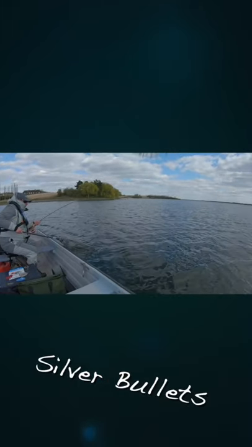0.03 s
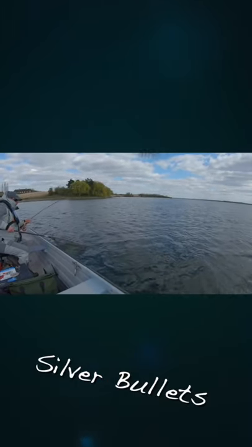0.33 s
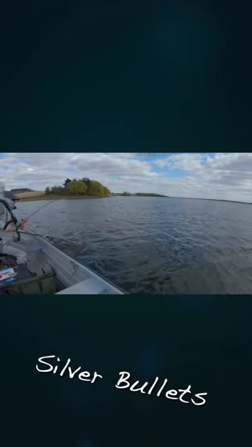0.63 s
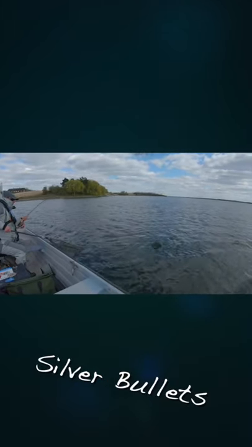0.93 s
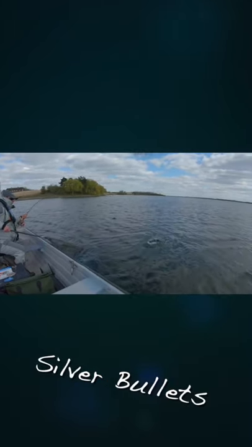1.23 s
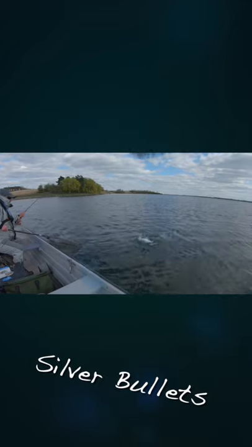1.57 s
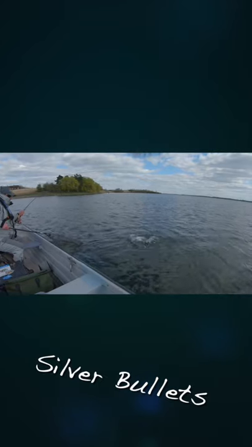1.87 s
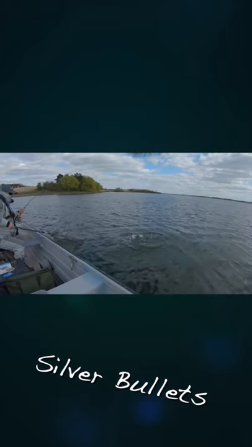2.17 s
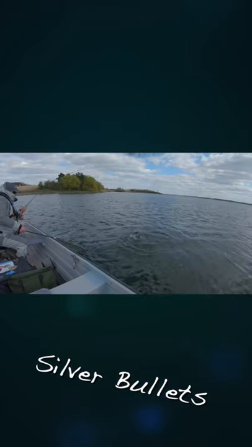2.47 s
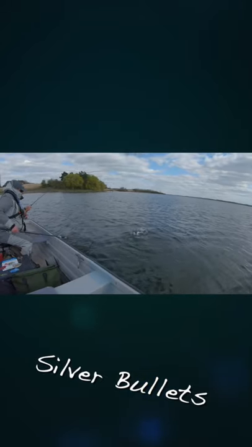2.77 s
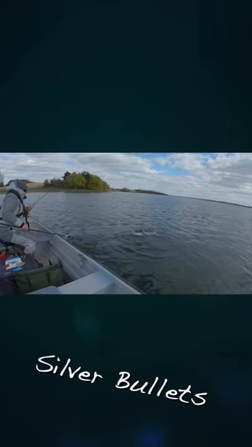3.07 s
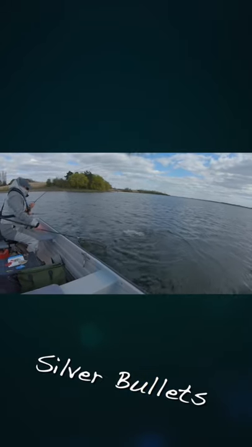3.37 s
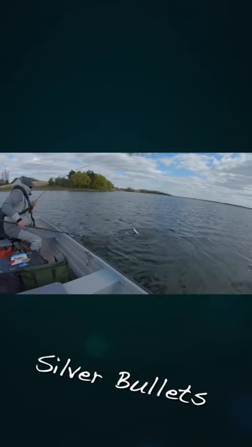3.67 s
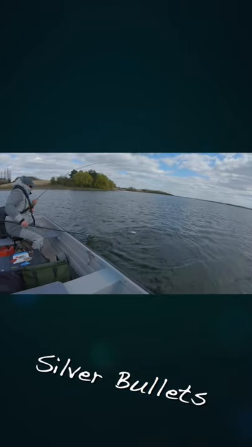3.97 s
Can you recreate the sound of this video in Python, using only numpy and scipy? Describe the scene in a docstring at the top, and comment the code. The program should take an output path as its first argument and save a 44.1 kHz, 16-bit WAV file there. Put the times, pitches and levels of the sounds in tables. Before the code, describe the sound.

A hooked fish thrashes at a lake's surface a few metres from a small boat. After some faint knocks, it splashes repeatedly with tail slaps, plops and gurgles, while wind rumbles on the microphone throughout.

```python
"""A hooked fish thrashes at the surface of a lake, a few metres from a small open boat.
Its tail slaps the water in broadband impacts and its plunging body traps gulps of air. Each bubble
rings as a damped oscillator: single ones plop, many gurgle, and spray patters back.
Turbulent wind buffets the microphone throughout, over a quiet hiss and a very faint electrical whine.
There are a few faint knocks in the boat and two sharp ticks."""
import sys
import numpy as np
from scipy import signal
from scipy.fft import rfft, irfft
from scipy.io import wavfile

SR = 44100
rng = np.random.default_rng(int(sys.argv[2]) if len(sys.argv) > 2 else 0)


def to_wav(sig):
    """Store sig (one row per channel, or 1-D mono) as 16-bit WAV at the path in sys.argv[1].

    Samples outside -1..1 are clipped; the rate is SR.
    """
    pcm = np.clip(np.atleast_2d(sig), -1, 1) * 32767
    pcm = np.round(pcm).astype(np.int16)
    wavfile.write(sys.argv[1], SR, pcm.T)  # frames by channels


N = 176400
TIME = np.arange(N) / SR

# Spectra of the still air and the three parts of the wind: f/Hz, relative spectral density/dB
AIR_SPECTRUM = [(1500, 1), (2500, -8), (4000, -8.5), (8000, -12.5), (15500, -16)]
BUFFET_SPECTRUM = [(4, 0), (20, -8), (50, -18), (70, -25), (200, -70)]
DRUM_SPECTRUM = [(35, -22), (60, -3), (78, 0), (90, -3), (105, -11), (250, -55)]
RUSH_SPECTRUM = [(80, -8), (135, 2), (200, -3), (350, -11), (600, -24), (900, -36), (3000, -68)]
# Strength of the wind's buffeting, drumming near 80 Hz and upper rush: t/s, relative level/dB
BUFFET_LEVELS = [(0.3, -38), (2.35, -35), (3.2, -38.5), (3.3, -34.5), (3.8, -38.5)]
DRUM_LEVELS = [(0.1, -39), (0.68, -33.5), (0.78, -26.5), (0.97, -37.5), (1.65, -18.5), (1.69, -36),
               (2.62, -32.5), (2.78, -22), (3.9, -23.5)]
RUSH_LEVELS = [(0.15, -42), (0.4, -49), (0.6, -50), (0.86, -43), (0.99, -45), (1.05, -55), (1.11, -44),
               (1.28, -42), (1.51, -47), (1.62, -40), (1.78, -53), (1.83, -47), (3.7, -42), (3.8, -46)]

# Knocks in the boat: t/s, bump level/dB, scuff level/dB
KNOCKS = [(0.139, -56, -67), (.277, -54, -58.5), (.48, -56, -70.5), (0.602, -58.5, -84), (.665, -66, -65)]
# Sharp ticks, probably from the tackle: t/s, level/dB
TICKS = [(2.599, -38), (2.617, -48.5)]
# Spectra of these contacts: f/Hz, relative spectral density/dB
BUMP_SPECTRUM = [(300, -10.5), (620, 2), (1250, -12), (2800, -25)]
SCUFF_SPECTRUM = [(1300, -2), (5000, -2.5), (8000, -16), (15000, -32.5)]
TICK_SPECTRUM = [(2300, 2), (5000, -7), (8000, -2), (11000, -12.5), (13500, -1), (15500, -14)]

# Amount of spray falling back: t/s, relative level/dB
SPRAY_LEVELS = [(1.0, -73.5), (1.11, -61), (1.3, -57.5), (1.42, -50.5), (1.56, -57), (1.66, -48.5),
                (1.78, -59), (1.95, -51), (2.14, -51.5), (2.26, -53), (2.38, -54.5), (2.47, -54),
                (2.67, -56.5), (2.9, -49.5), (3.02, -55), (3.32, -48), (3.53, -56.5), (3.62, -57.5),
                (3.78, -63), (4.0, -62)]
# Single bubbles: t/s, peak level of the tone/dB, starting f/Hz, 60 dB ring time/s
PLOPS = [(1.034, -45, 2310, 0.0049), (1.107, -38.5, 1790, .011), (1.168, -50, 817, .07),
         (1.202, -47, 2500, 0.023), (1.396, -34, 883, .018), (1.56, -50.5, 6650, 0.011),
         (1.615, -44, 7800, 0.0075), (1.724, -46, 980, .027), (1.965, -39, 1180, 0.0085),
         (1.997, -48, 1570, 0.043), (2.21, -36.5, 2020, 0.0095), (2.502, -40.5, 1970, .022),
         (2.552, -44, 1220, .025), (2.563, -41.5, 750, 0.026), (2.622, -40, 1650, 0.0089),
         (2.648, -42, 1630, 0.021), (2.8, -43.5, 960, 0.017), (2.922, -35.5, 493, 0.015),
         (2.944, -39.5, 840, 0.042), (3.021, -37, 887, 0.02), (3.102, -36.5, 1250, 0.021),
         (3.574, -30.5, 1950, 0.0051), (3.612, -49, 1820, 0.0069), (3.683, -47.5, 2140, 0.022),
         (3.757, -51.5, 1340, 0.015), (3.82, -53, 1260, 0.023), (3.896, -54, 1370, .014)]
# Plunges of the body: t/s, relative level/dB, hold time/s, centre f/Hz
PLUNGES = [(1.333, -49.5, 0.0088, 676), (1.381, -44.5, .012, 850), (1.469, -43, 0.011, 1050),
           (1.603, -42.5, .012, 1000), (1.616, -48.5, .05, 700), (2.162, -47, .012, 960),
           (2.173, -38, 0.011, 840), (2.453, -46.5, 0.022, 1140), (2.499, -42.5, 0.0092, 860),
           (2.518, -45.5, 0.026, 900), (2.87, -38.5, .012, 715), (2.971, -49.5, 0.089, 796),
           (3.076, -47.5, 0.015, 1030), (3.142, -49.5, 0.049, 1070), (3.389, -42.5, 0.031, 870),
           (3.426, -51, 0.1, 950)]
# Slaps of the tail: t/s, level/dB, decay time constant/s
SLAPS = [(1.337, -48.5, .003), (1.386, -44.5, 0.0049), (1.489, -40, 0.0072), (1.83, -50, 0.0089),
         (2.244, -49.5, 0.011), (2.326, -48, 0.0086), (2.718, -38, 0.0065), (2.865, -45.5, 0.017),
         (3.085, -44, 0.012), (3.312, -47.5, 0.0035), (3.356, -51, 0.0038), (3.75, -54, 0.0043)]
# Spectra of spray, displaced water, slaps and their snaps: f/Hz, relative spectral density/dB
SPRAY_SPECTRUM = [(400, 0.5), (800, 3.5), (1300, 0), (2300, -2.5), (3400, -6.5), (4500, -9.5),
                  (5600, -17.5), (8000, -11), (10000, -22), (13000, -18.5), (15500, -26)]
THUD_SPECTRUM = [(250, 0), (450, -2), (650, -8)]
SLAP_SPECTRUM = [(400, -4.5), (2500, -1), (4000, -5), (5800, -13), (8000, -9.5), (10500, -18), (13000, -20),
                 (15500, -35)]
SNAP_SPECTRUM = [(2500, -3), (8000, 0), (15000, -3)]

BUBBLE_ATTACK_S = .00076


def from_db(db):
    """Amplitude ratio: a factor of ten for every 20 dB."""
    return 10 ** (np.asarray(db) / 20)


def rms_one(x):
    """Normalisation to unit rms amplitude."""
    return x / np.sqrt(np.mean(x ** 2) + 1e-20)


def drift(corner_hz):
    """Low-pass filtered noise: a random fluctuation of unit rms."""
    hz = np.arange(N // 2 + 1) * SR / N
    return rms_one(irfft(rfft(rng.standard_normal(N)) / (1 + (hz / corner_hz) ** 2), N))


def level_curve(rows):
    """Gain at every sample, by linear interpolation of level in time."""
    return from_db(np.interp(TIME, *np.transpose(rows)))


def gain_at(spectrum, hz):
    """Gain at a frequency, by interpolation of level on a logarithmic frequency axis."""
    f, db = np.transpose(spectrum)
    return from_db(np.interp(np.log(hz), np.log(f), db))


def noise(spectrum):
    """Spectral shaping of white noise, rolling off beyond the ends of the spectrum; unit rms."""
    hz = np.arange(1, N // 2 + 2) * SR / N
    roll_off = (1 + (spectrum[0][0] / (2 * hz)) ** 4) * (1 + (hz / (2 * spectrum[-1][0])) ** 4)
    return rms_one(irfft(rfft(rng.standard_normal(N)) * gain_at(spectrum, hz) / roll_off, N))


def burst(start, attack_s, decay_s, hold_s=0):
    """Envelope of a transient: linear rise, hold and exponential decay."""
    age = TIME - start
    return np.clip(age / attack_s, 0, 1) * np.exp(-np.clip((age - attack_s - hold_s) / decay_s, 0, 50))


def background():
    """Stationary hiss and an electrical whine of three harmonics under random amplitude modulation."""
    whine_hz = 3910
    whine = sum(from_db(-7.5 * k) * np.sin(2 * np.pi * (k + 1) * whine_hz * TIME) for k in range(3))
    hiss = from_db(-72) * noise(AIR_SPECTRUM)
    waver_db = 6 * np.tanh(drift(corner_hz=18))
    return hiss + from_db(-80.5 + waver_db) * whine


def wind():
    """Turbulent pressure: slow eddies thump on the microphone and set it drumming, under a soft rush."""
    ceiling = .6  # amplitude at which the buffeting saturates
    eddies = from_db(24.5) * level_curve(BUFFET_LEVELS) * noise(BUFFET_SPECTRUM)
    buffet = ceiling * np.tanh(eddies / ceiling)
    drumming = from_db(-4) * level_curve(DRUM_LEVELS) * noise(DRUM_SPECTRUM)
    rush = from_db(3) * level_curve(RUSH_LEVELS) * noise(RUSH_SPECTRUM)
    puffs = from_db(1.8 * drift(corner_hz=25))
    flutter = from_db(1.2 * drift(corner_hz=20))
    return buffet + flutter * (drumming + rush * puffs)


def contacts(rows, spectrum, decay_s):
    """Heavily damped impacts: each (t/s, level/dB) row is a short burst of noise."""
    envelope = sum(from_db(db) * burst(start, attack_s=.0016, decay_s=decay_s) for start, db in rows)
    return noise(spectrum) * envelope


def knocks():
    """Damped vibration of the hull: a dull bump with a light scuff above it."""
    bumps = contacts([(start, db) for start, db, _ in KNOCKS], BUMP_SPECTRUM, decay_s=.023)
    scuffs = contacts([(start, db) for start, _, db in KNOCKS], SCUFF_SPECTRUM, decay_s=.014)
    return bumps + scuffs


def ticks():
    """A brief contact has a wide bandwidth, so these ticks reach far into the treble."""
    return contacts(TICKS, TICK_SPECTRUM, decay_s=.0038)


def bubble(age, hz, ring_s, rise):
    """Damped oscillator: nearing the surface, a bubble sharpens by the fraction `rise` per ring time."""
    age = np.clip(age, 0, 2 * ring_s)
    onset = np.clip(age / BUBBLE_ATTACK_S, 0, 1)
    decay = np.exp(-np.log(1000) * np.maximum(age - BUBBLE_ATTACK_S - ring_s / 10, 0) / ring_s)
    phase = 2 * np.pi * hz * age * (1 + rise * age / (2 * ring_s))
    return onset * decay * np.sin(phase)


def bubble_stream(hz, per_s, cycles, spread_db):
    """Random impulses excite one bubble resonance, which falls 60 dB in `cycles` periods; unit rms."""
    births = rng.random(N) < per_s / SR
    strengths = from_db(spread_db * np.minimum(rng.exponential(1, N), 4)) * rng.choice([-1, 1], N)
    pole_radius = from_db(-60 * hz / (cycles * SR))
    pole_angle = 2 * np.pi * hz / SR
    resonance = [1, 0, -1, 1, -2 * pole_radius * np.cos(pole_angle), pole_radius ** 2]
    soft_onset = signal.butter(1, [hz / 1.3, hz * 1.3], "band", fs=SR, output="sos")[0]
    return rms_one(signal.sosfilt([resonance, soft_onset], births * strengths + 1e-18))


def spray():
    """Incoherent superposition: thrown water falls back as short-ringing drops over a fine mist."""
    drops_per_s = 3800
    pitches = np.geomspace(485, 14570, 44)
    rates = drops_per_s * np.sqrt(pitches) / np.sqrt(pitches).sum()
    drops = np.zeros(N)
    for hz, per_s in zip(pitches, rates):
        band_gain = gain_at(SPRAY_SPECTRUM, hz) * np.sqrt(hz)  # higher bands are wider
        drops += band_gain * bubble_stream(hz, per_s, cycles=28, spread_db=3.5)
    clumps = from_db(1.4 * drift(corner_hz=45))
    mist = from_db(-8) * noise(SPRAY_SPECTRUM)
    return level_curve(SPRAY_LEVELS) * (from_db(-1.5) * rms_one(drops * clumps) + mist)


def gurgle():
    """Free oscillation of larger bubbles in the churned water: upward chirps that swell with the spray."""
    bubbles_per_s, low_hz, high_hz, ring_cycles = 110, 700, 3400, 34
    chirps = np.zeros(N)
    for when, pitch, strength in rng.random((int(bubbles_per_s * N / SR), 3)):
        hz = low_hz * (high_hz / low_hz) ** pitch
        first, ring_s = int(when * N), ring_cycles / hz
        age = TIME[:min(int(2 * ring_s * SR), N - first)]
        gain = from_db(2.5 * min(-np.log(1 - strength), 3))  # many weak, a few strong
        chirps[first:first + len(age)] += gain * bubble(age, hz, ring_s, rise=.12)
    fade_in = np.clip((TIME - SPRAY_LEVELS[0][0]) / .2, 0, 1)
    return from_db(-23.5) * fade_in * level_curve(SPRAY_LEVELS) ** .6 * rms_one(chirps)


def plops():
    """Bubble resonance: a lone bubble opens with a tiny splash and rings briefly, its pitch rising."""
    splash_decay_s, rise_per_s = .003, 6
    out, age = np.zeros(N + SR), TIME[:SR // 5]
    opening = np.minimum(age / BUBBLE_ATTACK_S, np.exp((BUBBLE_ATTACK_S - age) / splash_decay_s))
    for start, db, hz, ring_s in PLOPS:
        band = signal.butter(2, [hz / 1.45, hz * 1.45], "band", fs=SR, output="sos")
        splash = from_db(-9.5) * rms_one(signal.sosfilt(band, rng.standard_normal(len(age))))
        tone = bubble(age, hz, ring_s, rise=rise_per_s * ring_s)
        first = int(start * SR)
        out[first:first + len(age)] += from_db(db) * (tone + splash * opening)
    return out[:N]


def plunges():
    """Air entrainment: the body displaces water with a thud and traps large bubbles around one pitch."""
    bubbles_per_s, half_width_octaves = 2400, .42
    pitches = np.geomspace(418, 3280, 18)
    per_s = bubbles_per_s / len(pitches)
    streams = np.array([bubble_stream(hz, per_s, cycles=22, spread_db=4) for hz in pitches])
    thud = from_db(-7) * noise(THUD_SPECTRUM)
    out = np.zeros(N)
    for start, db, hold_s, centre_hz in PLUNGES:
        shares = 1 / (1 + (np.log2(pitches / centre_hz) / half_width_octaves) ** 2)
        envelope = burst(start, attack_s=.0027, decay_s=.004, hold_s=hold_s)
        gulp = envelope * (shares @ streams)
        gulp *= np.sqrt(np.sum(envelope ** 2) / np.sum(gulp ** 2))  # the envelope sets the energy
        out += from_db(db - 1) * (gulp + envelope * thud)
    return out


def slaps():
    """Impact on water: the tail makes a broadband crack and scatters droplets; hard slaps add a snap."""
    attack_s, snap_delay_s = .0015, .0015
    slap_envelope, snap_envelope = np.zeros(N), np.zeros(N)
    for start, db, decay_s in SLAPS:
        crack = burst(start, attack_s, decay_s)
        scatter = from_db(-13) * burst(start, attack_s=decay_s, decay_s=.018)
        slap_envelope += from_db(db) * (crack + scatter)
        snap_gain = from_db(31.5) * from_db(db) ** 2  # square law: harder slaps are brighter
        snap_envelope += snap_gain * burst(start + snap_delay_s, attack_s, decay_s=.002)
    crackle = rms_one(from_db(3 * drift(corner_hz=500)))
    return slap_envelope * crackle * noise(SLAP_SPECTRUM) + snap_envelope * noise(SNAP_SPECTRUM)


def scene():
    """Linear superposition of the fish, the boat, the wind and the background, in mono."""
    fish = spray() + plunges() + plops() + slaps()
    boat = ticks() + knocks()
    return (fish + boat + wind() + background())[None]


def record(dry):
    """Band limiting: an elliptic low-pass filter cuts the top of the treble steeply."""
    cutoff_hz = 15800
    return signal.sosfilt(signal.ellip(10, .1, 80, cutoff_hz, fs=SR, output="sos"), dry)


dry = scene()
out = record(dry)
to_wav(out)
```